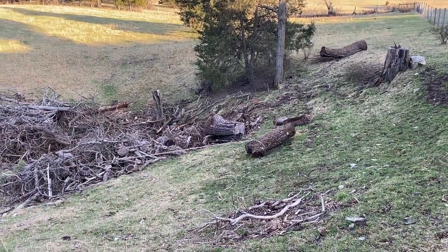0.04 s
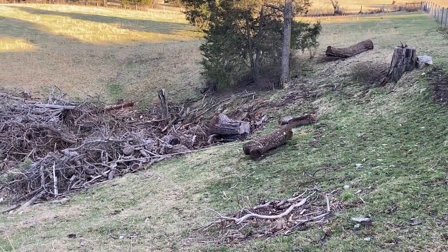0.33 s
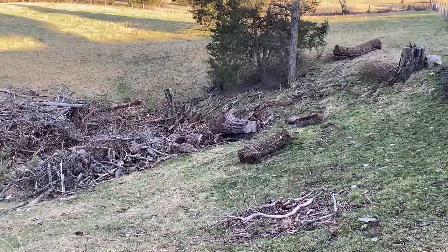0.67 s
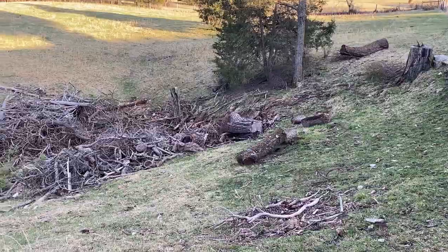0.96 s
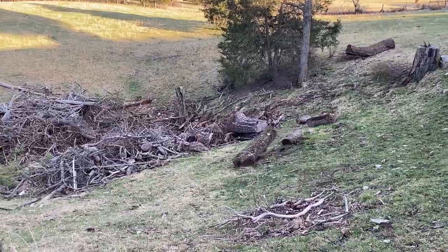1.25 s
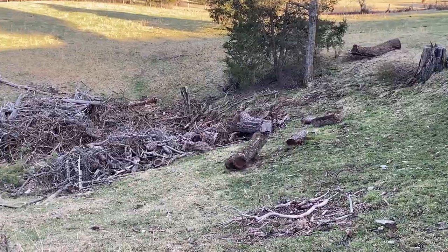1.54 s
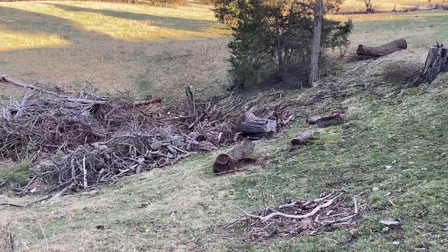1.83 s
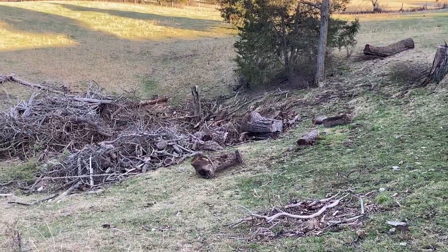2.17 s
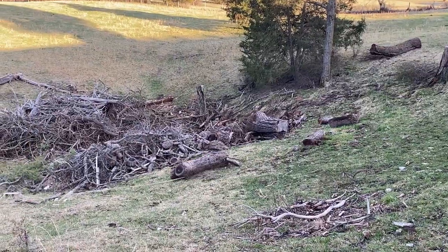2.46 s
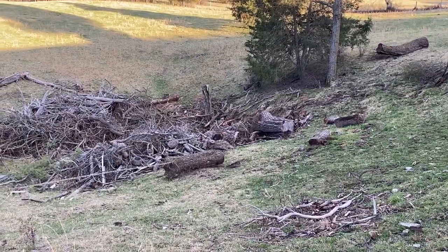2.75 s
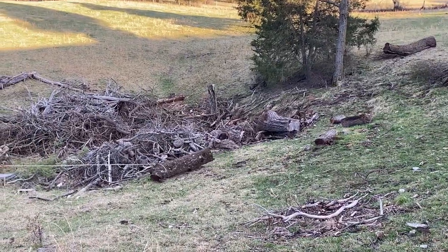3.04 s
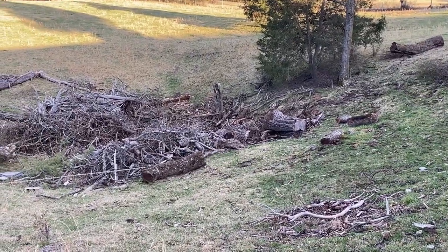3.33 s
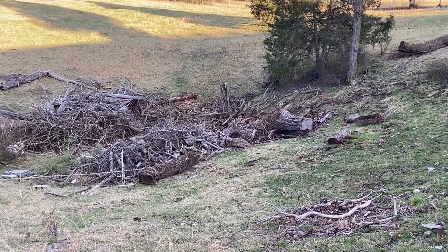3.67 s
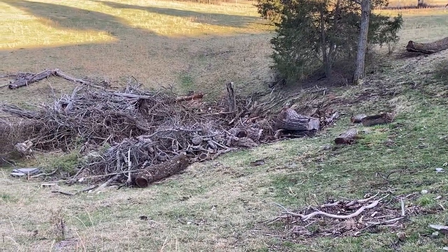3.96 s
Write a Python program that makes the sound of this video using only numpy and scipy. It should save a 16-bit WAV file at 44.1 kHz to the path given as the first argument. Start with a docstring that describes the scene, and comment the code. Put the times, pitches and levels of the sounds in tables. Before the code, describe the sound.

A log rolls over dry grass, snapping twigs from about 0.3 seconds and thumping the turf repeatedly from 0.6. Wood clacks on wood near 0.9, 1.8, 2.4 and 2.8 seconds. From 3.2 the log crunches into brushwood with louder cracks and thuds. An engine hums slightly left throughout, sagging around 2.5 and recovering by 3.4. Faint wind puffs on the microphone near 2.1 and 3.3 seconds.

```python
"""Log rolling down a grassy slope

A cut log rolls past the microphone: it crushes grass, thumps the turf, snaps twigs and crunches
into a brush pile. Off to the left an engine hums, sags and recovers, and to one side wood clacks
on wood a few times. Light wind hisses in the grass and now and then puffs on the microphone."""
import sys
import numpy as np
from scipy import signal
from scipy.fft import rfft, irfft, next_fast_len
from scipy.io import wavfile
from scipy.ndimage import map_coordinates

SR = 44100
rng = np.random.default_rng(int(sys.argv[2]) if len(sys.argv) > 2 else 0)


def dump(signal):
    """Clip the signal to [-1, 1] and save it as 16-bit WAV at the path in sys.argv[1]."""
    limited = np.clip(np.atleast_2d(signal).T, -1, 1)
    pcm = np.round(limited * 32767).astype(np.int16)
    wavfile.write(sys.argv[1], SR, pcm)


N = 4 * SR

# wind puffs on the microphone: centre_s, level_db
WIND_PUFFS = [(2.1, -35), (3.0, -47), (3.27, -34.5)]
# the engine's running: time_s, firing_hz, level_db, overtones_db
ENGINE_RUN = [(0, 71.9, -32, -6), (.3, 77.1, -28, -10), (.54, 75.3, -32.5, -2.5), (.79, 73.16, -31.5, -4),
              (1.25, 75.44, -32, -1), (1.9, 76.4, -32, -1.5), (2.19, 72.2, -33, 2.5),
              (2.51, 62.03, -41, 5.5), (2.62, 62.3, -39.5, -21), (2.69, 63.3, -29, -8),
              (2.91, 57.83, -34, -22), (3.13, 58.05, -46, 10.5), (3.35, 72.37, -31.5, -7),
              (3.49, 76.66, -28, 1.5), (3.63, 76, -37, 1.5), (3.83, 71.9, -37.5, 0), (4, 75, -45.5, -13)]
# partials of the three-cylinder engine, order 6 at the firing rate: order, gain_db
ENGINE_ORDERS = {5: -21, 6: 0, 7: -14, 8: -12, 11: -30.5, 12: -16.5, 13: -31, 15: -22, 16: -20.5, 18: -36.5}
# a higher hum that sinks and fades beside the engine: time_s, pitch_hz, level_db
HIGH_HUM = [(0, 175.2, -41), (.25, 176, -40.5), (.5, 175.1, -40.5), (.72, 169, -42.5), (1.0, 164.4, -49),
            (1.5, 165.8, -47.5), (2.2, 165.1, -55.5), (4, 167.8, -51)]
# wooden blows off to the side: start_s, level_db, edge_db, knock_db
CLACK_BLOWS = [(0.9293, -21, -54, -30), (1.825, -32.5, -66, -41), (1.85, -32, -50, -38.5),
               (2.398, -25, -58, -43), (2.4213, -22, -43.5, -38), (2.74, -34, -52, -48),
               (2.817, -23, -39.5, -38.5), (2.857, -20, -46, -36.5)]
# modes of the struck wood: pitch_hz, gain_db, t60_s
WOOD_MODES = [(594.8, -10, .14), (956, 8.5, 0.073), (1192, 16, 0.056), (1383, 10.5, 0.063),
              (1600, 5, 0.066), (1686, 1, 0.098), (2010, -3, 0.099), (2219, -2.5, 0.079)]
# grass crushed under the log: time_s, level_db
GRASS_CRUSH = [(0, -70.5), (.24, -62), (.35, -69.5), (.52, -64), (.69, -54), (.98, -55.5), (1.11, -60),
               (1.43, -50), (1.61, -57.5), (1.72, -48.5), (1.86, -56.5), (1.99, -48.5), (2.25, -58),
               (2.46, -61.5), (2.57, -55.5), (2.62, -46), (2.72, -50), (2.88, -54), (2.94, -54.5),
               (3.04, -53), (3.14, -61), (3.21, -48.5), (3.3, -62), (3.4, -58.5), (3.45, -42.5),
               (3.53, -58), (3.68, -48), (3.76, -52.5), (3.93, -48), (4, -49)]
# sticks grinding under the log: time_s, level_db
STICK_GRIND = [(0, -59), (.38, -55.5), (.55, -51.5), (.75, -50.5), (.82, -50.5), (.9, -56), (1.2, -55),
               (1.43, -50), (1.7, -59.5), (1.96, -52.5), (2.04, -42), (2.12, -59), (2.2, -45),
               (2.28, -51.5), (2.75, -51), (3.0, -57), (3.15, -63.5), (3.21, -36.5), (3.25, -43.5),
               (3.29, -52), (3.33, -44), (3.37, -45.5), (3.41, -53.5), (3.43, -41), (3.47, -35.5),
               (3.52, -55.5), (3.62, -51.5), (3.76, -53.5), (3.81, -46.5), (3.87, -44), (3.94, -40),
               (4, -48)]
# brushwood giving way: centre_s, level_db, half_length_s
BRUSH_CRUSHES = [(1.415, -40.5, 0.0091), (2.332, -39, 0.0049), (3.171, -41, 0.0028), (3.182, -40, .003),
                 (3.201, -42, 0.0062), (3.224, -37, 0.0037), (3.426, -36, .003), (3.483, -39.5, .003),
                 (3.6525, -26.5, 0.0016), (3.666, -40.5, 0.0094), (3.803, -50.5, 0.027),
                 (3.858, -41, 0.0016), (3.872, -40.5, 0.0072), (3.91, -46.5, 0.0044), (3.935, -40, 0.016),
                 (3.997, -49, .006)]
# thin twigs snapping: start_s, level_db, t60_s
TWIG_SNAPS = [(.275, -42, 0.032), (.467, -43.5, 0.018), (0.5164, -38.5, 0.019), (.574, -31, 0.026),
              (0.6174, -29.5, 0.021), (0.7444, -19.5, 0.01), (.947, -37, 0.013), (1.1813, -29.5, 0.011),
              (1.2466, -34.5, 0.0077), (1.403, -31, 0.02), (1.412, -33, 0.028), (1.6523, -37, 0.014),
              (1.9414, -32, 0.0077), (2.1555, -35.5, 0.014), (2.2696, -34.5, 0.025), (2.326, -35, 0.024),
              (2.488, -35.5, 0.018), (2.539, -32.5, 0.054), (2.591, -37.5, 0.043), (2.62, -31, .03),
              (2.9691, -34.5, 0.026), (3.17, -36, 0.028), (3.1931, -23, 0.01), (3.425, -42, 0.018),
              (3.48, -29.5, .025), (3.6502, -17, 0.011), (3.655, -21.5, .03), (3.721, -32, .03),
              (3.921, -34, 0.043)]
# thicker sticks breaking: start_s, level_db, t60_s
STICK_CRACKS = [(.42, -33, 0.08), (.516, -31.5, .07), (.591, -33, 0.035), (.617, -35.5, 0.061),
                (.68, -36, .06), (.745, -26, 0.029), (.812, -34.5, 0.18), (2.33, -27.5, 0.097),
                (2.545, -34, 0.048), (3.219, -26, 0.12), (3.24, -30, 0.21), (3.426, -28.5, 0.1),
                (3.459, -30, 0.067), (3.48, -32, .05), (3.651, -37.5, 0.066), (3.699, -30, 0.021),
                (3.864, -29.5, 0.057), (3.919, -40, 0.075)]
# the log landing on turf: start_s, level_db, pitch_hz, t60_s
LANDINGS = [(0.589, -33, 235.6, 0.19), (0.957, -26.5, 131.4, 0.33), (1.012, -34.5, 239.5, 0.17),
            (1.379, -35, 235, 0.26), (1.838, -37, 251.3, 0.37), (2.025, -29.5, 192.4, 0.3),
            (2.36, -32, 225, 0.35), (2.634, -30, 128.7, 0.48), (2.675, -24.5, 115.6, 0.32),
            (2.74, -30, 134.4, 0.48), (2.861, -25, 106.4, 0.35), (3.011, -26, 125.7, 0.13),
            (3.198, -23.5, 214, 0.11), (3.446, -20, 150.5, 0.25), (3.56, -32, 124.6, .3),
            (3.683, -31, 207.6, 0.36), (3.822, -31, 200, 0.35), (3.917, -27, 199, 0.34)]

# spectral shapes of the noises: frequency_hz, density_db
PUFF_COLOUR = [(15, -4), (35, -8), (45, 6), (70, -48), (300, -85)]  # deep rumble on the microphone
BREEZE_COLOUR = [(100, -11), (500, 20), (2000, -8), (5000, -34), (16000, -69)]  # soft hiss in the grass
EXHAUST_COLOUR = [(25, -24.5), (50, 2), (90, 3.5), (200, -5), (300, -5.5), (500, -15.5), (1000, -25.5),
                  (2000, -25.5), (2350, -23), (2700, -37), (4700, -34), (5600, -43.5), (9000, -68)]  # low rush of the exhaust
RATTLE_COLOUR = [(200, -30), (500, -15), (1100, 8.5), (1650, -8), (2300, -9), (2800, -14), (5600, -30),
                 (9000, -66)]  # chatter after a clack
EDGE_COLOUR = [(1500, -14), (2400, -8.5), (3200, 7), (4400, -0.5), (5100, -7), (6000, -14), (9000, -42)]  # bright splitting edge of a clack
KNOCK_COLOUR = [(150, 1), (330, 12.5), (650, 8), (1000, 7), (1400, 5), (2200, -17.5), (6000, -59)]  # dull knock just after a clack
GRASS_COLOUR = [(200, -48), (1000, 2), (2500, -0.5), (4000, 2), (7000, 1), (15500, -3)]  # crisp dry blades
GRIND_COLOUR = [(100, 4.5), (300, -5), (650, 5), (1000, 3), (1400, 0.5), (2000, -8.5), (3500, -12.5),
                (6000, -10.5), (12000, -73)]  # body of the grinding sticks
BRUSH_COLOUR = [(1500, -10), (2600, -7.5), (3200, 5.5), (4000, 0), (5500, -7), (8000, -7), (16000, -33)]  # splintering brushwood
TWIG_COLOUR = [(300, 4.5), (1200, 9), (2200, -0.5), (3200, 5.5), (5500, 3.5), (16000, -1)]  # bright twigs and stalks
CRACK_COLOUR = [(150, -21), (450, -3.5), (700, 3.5), (1050, 1.5), (1400, -3), (2000, -7.5), (3500, -22.5),
                (9000, -45)]  # darker, thicker sticks


def amp(db):
    return 10 ** (np.asarray(db) / 20)


def unit(x):
    return x / np.sqrt(np.mean(x ** 2) + 1e-20)


def curves(rows):
    """One value per sample for each column after the time."""
    times, *columns = np.transpose(rows)
    return [np.interp(np.arange(N) / SR, times, column) for column in columns]


def wobble(rate):
    """A smooth random curve, rate knots a second."""
    return map_coordinates(rng.standard_normal(4096), [np.arange(N) * rate / SR], mode="wrap")


def swell(centre_s, db, half_length_s):
    """A bell-shaped rise and fall in level."""
    return amp(db) * np.exp(-((np.arange(N) / SR - centre_s) / half_length_s) ** 2)


def filtered(x, response):
    """x through a complex response of frequency."""
    size = next_fast_len(N + SR // 2)
    return irfft(rfft(x, size) * response(np.fft.rfftfreq(size, 1 / SR)), size)[..., :N]


def coloured(x, colour):
    """x through a minimum-phase filter of unit energy with the given spectral shape."""
    size = 8192
    hz, db = np.transpose(colour)
    shape_db = np.interp(np.log(np.fft.rfftfreq(size, 1 / SR) + 1), np.log(hz), db)
    cepstrum = irfft(np.log(amp(shape_db)))
    cepstrum[1:size // 2] *= 2
    cepstrum[size // 2 + 1:] = 0
    impulse = irfft(np.exp(rfft(cepstrum)))[:size // 2]
    return signal.fftconvolve(x, impulse / np.linalg.norm(impulse))[:N]


def noise(colour):
    """Coloured noise of rms 1."""
    return unit(coloured(rng.standard_normal(N), colour))


def crackle(colour, per_s, spread_db, bed):
    """Tiny random fractures of uneven size on a bed of noise, rms 1."""
    sizes = amp(spread_db * np.minimum(rng.exponential(size=N), np.pi)) * rng.choice([-1, 1], N)
    fractures = unit(sizes * (rng.random(N) < per_s / SR))
    return unit(coloured(fractures + bed * rng.standard_normal(N), colour))


def add(track, start_s, sound):
    part = track[round(start_s * SR):][:len(sound)]
    part += sound[:len(part)]


def bursts(rows, colour, fibres_per_s=1400, spread_db=2.5):
    """Wood fibres give way one after another in uneven, dying bursts of noise."""
    track, t = np.zeros(N), np.arange(SR // 5) / SR
    for start_s, db, t60 in rows:
        fibres = np.interp(t * fibres_per_s, np.arange(512), rng.standard_normal(512))
        envelope = unit(amp(spread_db * fibres)) * amp(db - 60 * t / t60)
        add(track, start_s, envelope * rng.standard_normal(len(t)))
    return coloured(track, colour)


def placed(x, lead_s, left_db):
    """A source at the stereo microphone: the left side is lead_s earlier and left_db louder."""
    sides = np.array([[.5], [-.5]])
    return filtered(x, lambda hz: amp(left_db * sides) * np.exp(2j * np.pi * hz * lead_s * sides))


def spread(make, width):
    """A diffuse stereo pair out of two draws of one texture."""
    mid, side = make(), width * make()
    return np.array([mid + side, mid - side])


def wind():
    """A faint hiss in the grass all around, and soft low puffs right on the microphone."""
    gusts = sum(swell(centre_s, db, half_length_s=0.04) for centre_s, db in WIND_PUFFS)
    puffs = gusts * noise(PUFF_COLOUR)
    hiss = amp(-72.5 + 1.1 * wobble(6.5)) * spread(lambda: noise(BREEZE_COLOUR), width=1.0)
    return puffs + hiss


def slope_echo(x, t60_s=0.068, attack_s=0.00079):
    """Slope and trees scatter a short, dull tail."""
    t = np.arange(SR // 2) / SR
    scatter = signal.lfilter([1], [1, -.6], rng.standard_normal((2, len(t))))
    tail = scatter * amp(-60 * t / t60_s) * (1 - np.exp(-t / attack_s))
    return signal.fftconvolve(x, tail / np.linalg.norm(tail[0]), axes=1)[:, :N]


def engine(firing_order=6, lead_s=0.000486):
    """Off to the left, uneven firings hum over pulsing exhaust noise; a higher hum fades beside them."""
    firing_hz, level_db, overtones_db = curves(ENGINE_RUN)
    high_hz, high_db = curves(HIGH_HUM)
    cycle = np.cumsum(firing_hz) / SR / firing_order
    hum = amp(high_db + wobble(8.3)) * np.sin(2 * np.pi * np.cumsum(high_hz) / SR)
    for order, db in ENGINE_ORDERS.items():
        swing_db = 0.5 * wobble(4.92) if order == firing_order else overtones_db + 4.9 * wobble(6.4)
        hum += amp(level_db + db + swing_db) * np.sin(2 * np.pi * (order * cycle + rng.random()))
    pulsing = 1 + 0.19 * np.cos(2 * np.pi * firing_order * cycle)
    exhaust_db = -40.5 + 0.23 * (level_db - level_db.mean())
    exhaust = amp(exhaust_db) * pulsing * noise(EXHAUST_COLOUR)
    return placed(np.sqrt(2) * hum, lead_s, left_db=.5) + placed(exhaust, lead_s, left_db=2.0)


def wood_ring(roughness=0.98, detune=0.0176, scatter_db=0.5, attack_s=0.0015):
    """Struck wood rings in short, rough modes that shift as each blow lands on another spot."""
    track, t = np.zeros(N), np.arange(SR // 4) / SR
    attack = 1 - np.exp(-t / attack_s)
    for start_s, blow_db, _, _ in CLACK_BLOWS:
        for hz, mode_db, t60 in WOOD_MODES:
            knots = rng.standard_normal(128) + 1j * rng.standard_normal(128)
            chatter = 1 + roughness * np.interp(t * 260, np.arange(128), knots)
            pitch_draw, level_draw = rng.standard_normal(2)
            tone = np.exp(2j * np.pi * (hz * (1 + detune * pitch_draw) * t + rng.random()))
            db = blow_db + mode_db - 18 - scatter_db * level_draw
            add(track, start_s, amp(db - 60 * t / t60) * attack * (chatter * tone).real)
    return track


def clacks(rattle_t60_s=0.23, edge_t60_s=0.095, knock_t60_s=0.24, knock_late_s=0.009):
    """Wood on wood off to one side: a ring, a rattling tail, a splitting edge and a dull knock."""
    ring = wood_ring()
    rattle = bursts([(s, db - 12, rattle_t60_s) for s, db, _, _ in CLACK_BLOWS], RATTLE_COLOUR)
    edge = bursts([(s, db, edge_t60_s) for s, _, db, _ in CLACK_BLOWS], EDGE_COLOUR)
    knock = bursts([(s + knock_late_s, db, knock_t60_s) for s, _, _, db in CLACK_BLOWS], KNOCK_COLOUR)
    return placed(ring + rattle + edge + knock, lead_s=0.00046, left_db=-1.5)


def rolling():
    """The log crushes dry grass, with ticks of single stalks, grinds sticks and splinters brushwood."""
    grass_db, = curves(GRASS_CRUSH)
    sticks_db, = curves(STICK_GRIND)
    blades = spread(lambda: crackle(GRASS_COLOUR, per_s=2500, spread_db=4.0, bed=0.93), width=0.27)
    stalks = amp(-5.5) * crackle(TWIG_COLOUR, per_s=120, spread_db=9.5, bed=0)
    sticks = spread(lambda: crackle(GRIND_COLOUR, per_s=500, spread_db=0.5, bed=0.66), width=0.31)
    brush = spread(lambda: crackle(BRUSH_COLOUR, per_s=1100, spread_db=-3, bed=0.072), width=0.17)
    grass = (blades + stalks) * amp(grass_db + 1.64 * wobble(70))
    sticks *= amp(sticks_db + 1.22 * wobble(40))
    brush *= sum(swell(*crush) for crush in BRUSH_CRUSHES)
    return placed(grass, lead_s=-.00027, left_db=.2) + placed(sticks + brush, lead_s=.00005, left_db=2.5)


def twigs(core_late_s=0.00063, core_t60_s=0.0026):
    """In front, twigs snap brightly, with a click as the core gives way; thicker sticks crack lower."""
    snaps = amp(-9) * spread(lambda: bursts(TWIG_SNAPS, TWIG_COLOUR), width=0.44)
    cores = bursts([(s + core_late_s, db - 2, core_t60_s) for s, db, _ in TWIG_SNAPS], TWIG_COLOUR)
    cracks = amp(-6) * spread(lambda: bursts(STICK_CRACKS, CRACK_COLOUR), width=0.15)
    return snaps + placed(cores + cracks, lead_s=.00004, left_db=0)


def thumps(attack_s=0.0025, tone_db=8):
    """Each landing of the log gives a dull tone within a short rumble of the turf."""
    track, t = np.zeros(N), np.arange(SR // 2) / SR
    for start_s, db, hz, t60 in LANDINGS:
        offsets = np.linspace(-1, 1, 6) + 0.1425 * rng.standard_normal(6)
        rumble_hz = hz * np.exp(0.5 * offsets)
        rumble = np.sin(2 * np.pi * (rumble_hz[:, None] * t + rng.random((6, 1)))).sum(0)
        tone = amp(tone_db) * np.sin(2 * np.pi * hz * t)
        envelope = (1 - np.exp(-t / attack_s)) * amp(-60 * t / t60)
        rms = amp(db) * np.sqrt(np.mean(envelope ** 2))
        add(track, start_s, rms * unit((rumble + tone) * envelope))
    return placed(track, lead_s=0.0006, left_db=1.5)


def scene():
    """The open slope from one spot; only the breaking twigs and the clacks raise a weak echo."""
    sharp = twigs() + clacks()
    return engine() + rolling() + thumps() + sharp + amp(-13) * slope_echo(sharp) + wind()


def record(dry, low_cut_hz=32.3, top_hz=15950):
    """The microphone drops the deepest bass and cuts off steeply at its band limit."""
    thinned = filtered(dry, lambda hz: hz ** 2 / np.sqrt(hz ** 4 + low_cut_hz ** 4))
    return filtered(thinned, lambda hz: 1 / np.sqrt(1 + (hz / top_hz) ** 120))


dry = scene()
out = record(dry)
dump(out)
```